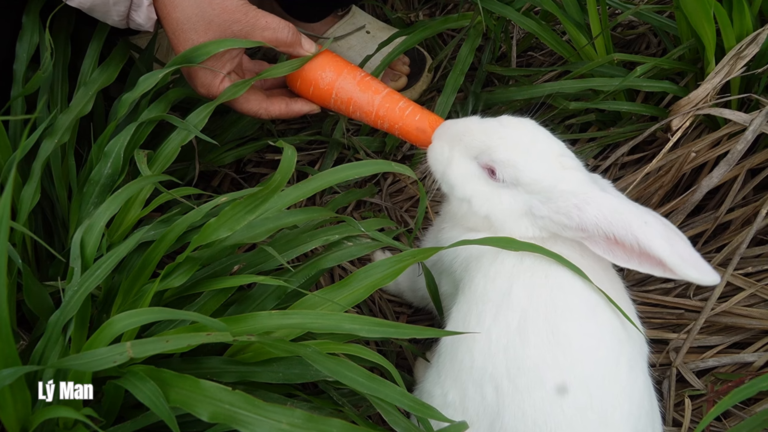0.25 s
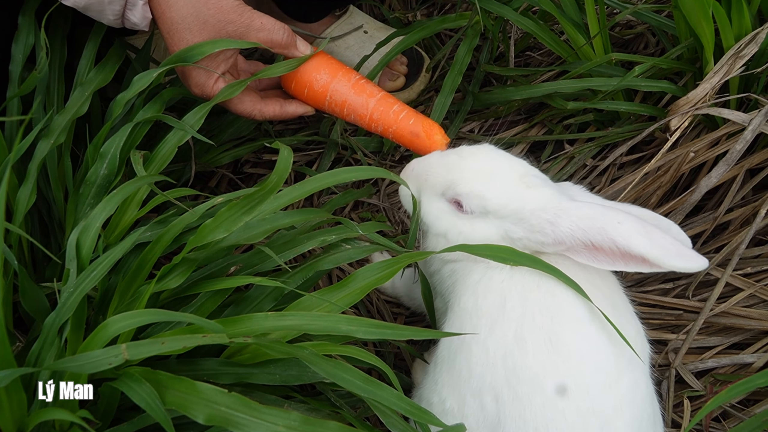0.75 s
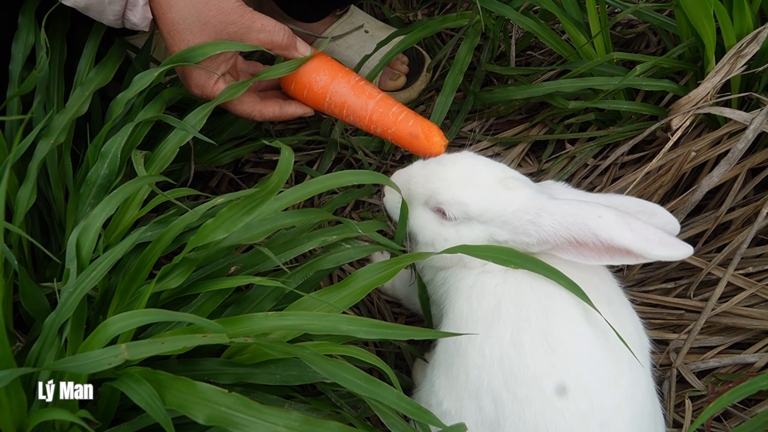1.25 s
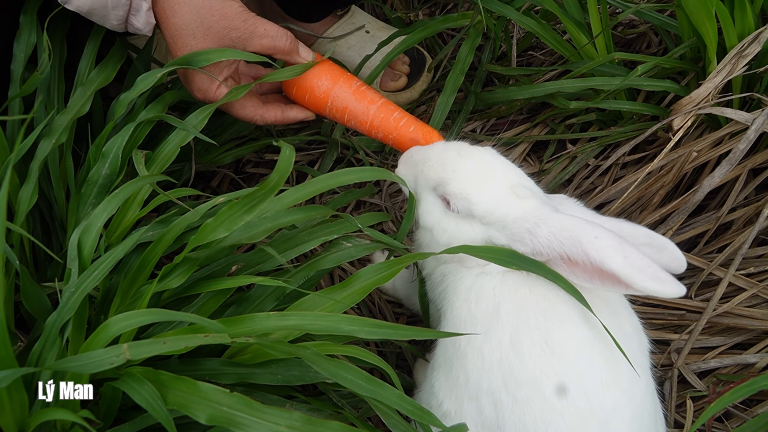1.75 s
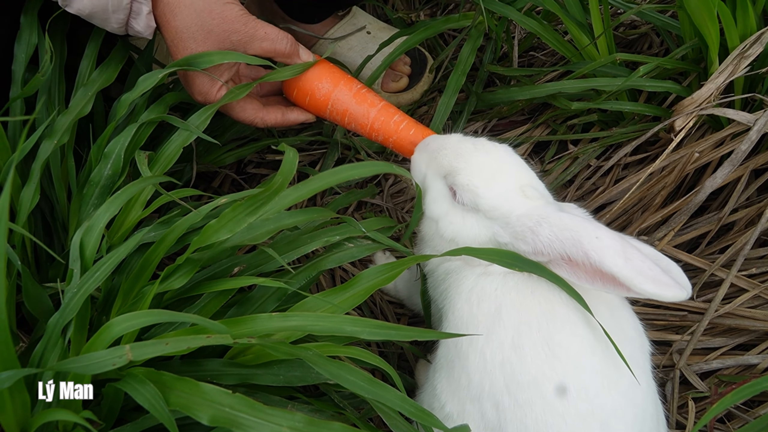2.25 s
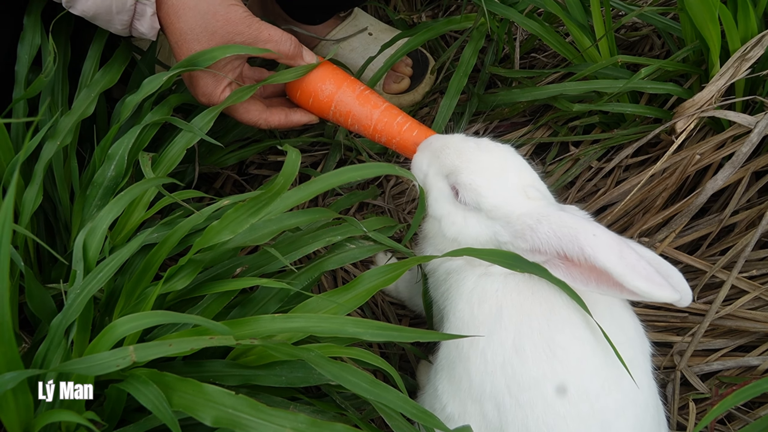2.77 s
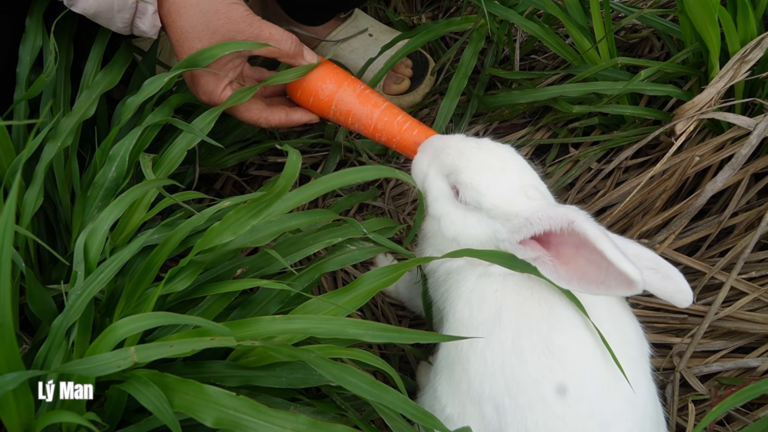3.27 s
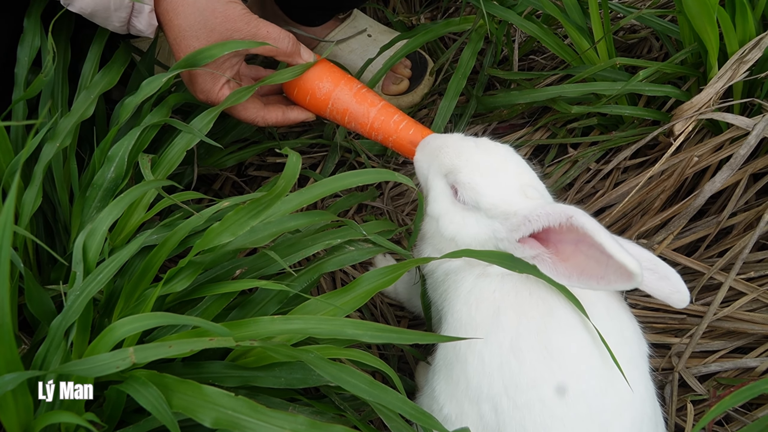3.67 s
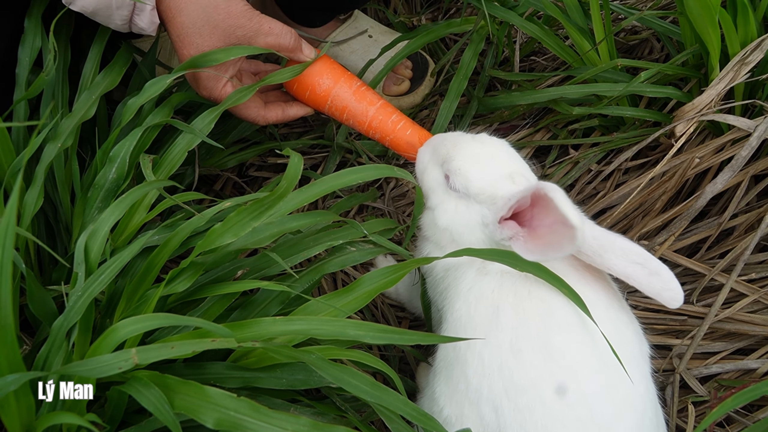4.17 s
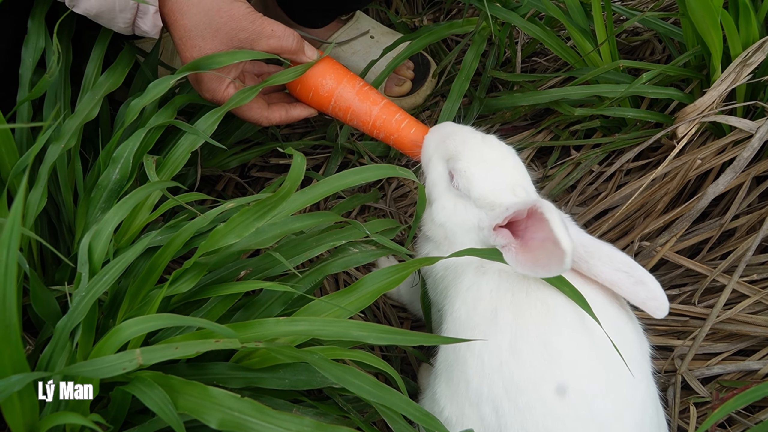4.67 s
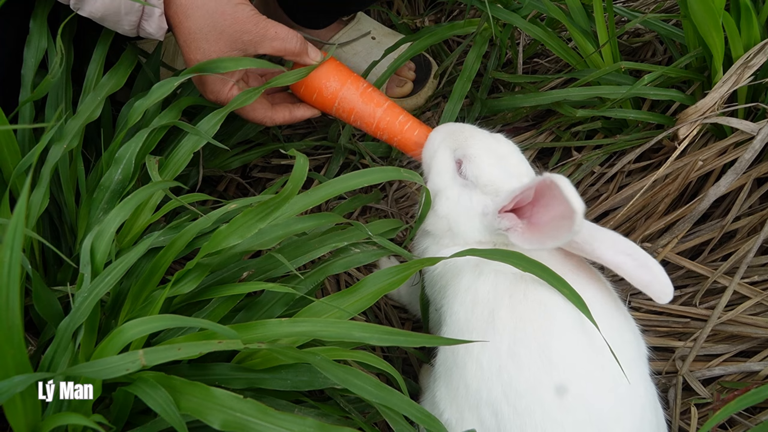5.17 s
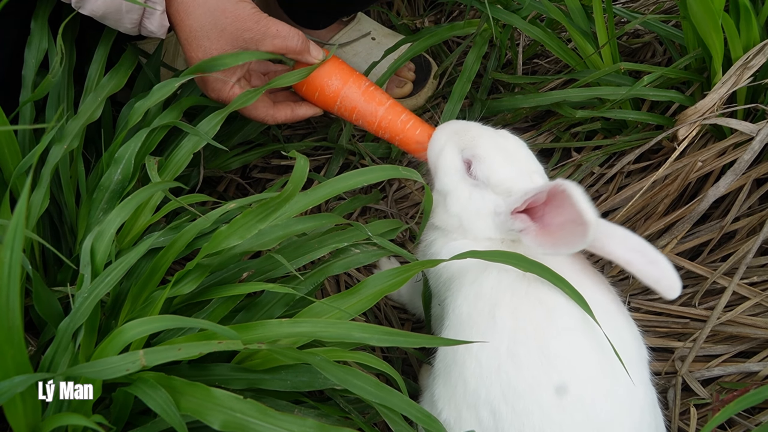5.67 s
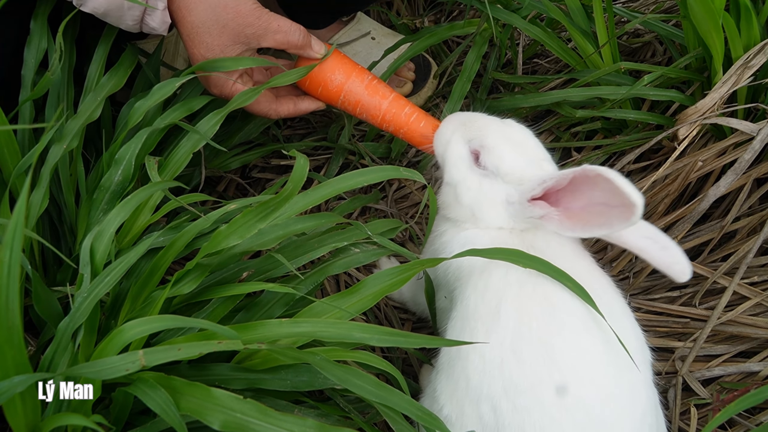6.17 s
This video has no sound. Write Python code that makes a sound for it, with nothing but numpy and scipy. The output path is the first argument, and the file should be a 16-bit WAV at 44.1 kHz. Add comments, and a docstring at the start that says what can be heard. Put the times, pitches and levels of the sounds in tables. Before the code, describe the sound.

A soft, even hiss of woodland air runs throughout. A distant bird repeats short falling peeps while another answers with thin rising chips, both softened by the trees. Near the middle a closer bird calls twice with downward whistles. Towards the end a rabbit near the microphone snaps off a few small, crisp bits of carrot, with dry clicks and crunches.

```python
"""A rabbit nibbles a carrot in tall grass on a wooded hillside.
From the start, countless far sources merge into an even hiss; a distant bird whistles falling peeps
and another answers with rising chips, all scattered by the trees. Near the middle a closer bird calls
twice, and faint slurs follow from deeper in the wood. Towards the end the rabbit's teeth snap off
a few crisp bits, each fracture ringing the carrot and jaw."""
import sys
import numpy as np
from scipy import signal
from scipy.fft import rfft, irfft
from scipy.io import wavfile

SR = 44100
rng = np.random.default_rng(int(sys.argv[2]) if len(sys.argv) > 2 else 0)


def wav_record(signal):
    """Record a signal, one row per channel, as 16-bit PCM in the file named by sys.argv[1]."""
    frames = np.transpose(np.atleast_2d(signal))
    bounded = np.clip(frames, -1, 1)
    # unit amplitude maps onto the largest positive 16-bit level
    quanta = np.round(bounded * 32767).astype(np.int16)
    wavfile.write(sys.argv[1], SR, quanta)


N = 283122
TIME = np.arange(N) / SR
BIN_HZ = np.maximum(np.fft.rfftfreq(N, 1 / SR), 1)


def nibbling(crumble_db=1.5, second_crack_s=0.0012, cells_per_s=18000, pivot_hz=9000):
    """Brittle fracture: two cracks and a crackle of bursting cells excite resonances of carrot and jaw."""
    # Each row: start in seconds, relative level in dB, crumbling time in seconds, tilt in dB per octave.
    bites = [(3.6385, -41, .003, 4), (4.8138, -33.5, 0.004, -1), (5.0438, -41, .005, 3),
             (5.0902, -32.5, .003, -1), (5.3122, -36, .001, 0), (5.331, -38.5, .006, -1),
             (5.3385, -37, 0.006, -1.5), (5.3697, -25, 0.0024, .5), (5.578, -45, 0.018, 1),
             (5.613, -39, .003, -1), (6.105, -48, .025, 2)]
    # Each row: resonant frequency in Hz, bandwidth in Hz, relative gain in dB.
    carrot_modes = [(1270, 310, 10), (2700, 1200, -4), (6000, 2000, -4), (9400, 2000, 2),
                    (14800, 2500, -1.5)]
    out = np.zeros(N)
    t = TIME[:SR // 10]
    for start, level_db, crumble_s, tilt_db in bites:
        force = (rng.random(len(t)) < cells_per_s / SR) * rng.standard_normal(len(t))
        force *= from_db(crumble_db) * np.exp(-t / crumble_s)
        force[[0, int(second_crack_s * SR)]] += [.8, -1]  # the two cracks
        at = int(start * SR)
        for k, (hz, width_hz, mode_db) in enumerate(carrot_modes):
            gain = from_db(level_db + mode_db + tilt_db * np.log2(hz / pivot_hz))
            out[at:at + len(t)] += (-1) ** k * gain * resonance(force, hz, width_hz)
    return out


def near_calls():
    """Frequency and amplitude modulation: two whistles start thin, then bend down as they swell."""
    # One list per call. Each row: time in seconds, pitch in Hz, relative level in dB.
    calls = [
        [(2.495, 4900, -46), (2.512, 4710, -51), (2.533, 4530, -47), (2.545, 4300, -50), (2.556, 4000, -44),
         (2.572, 3660, -41), (2.594, 3450, -46)],
        [(2.856, 4790, -51), (2.892, 4500, -53), (2.91, 4370, -47), (2.93, 4090, -44), (2.949, 3740, -38.5),
         (2.968, 3570, -41)],
    ]
    notes = []
    for rows in calls:
        times, hz, db = np.transpose(rows)
        at = np.flatnonzero((TIME >= times[0]) & (TIME < times[-1]))
        notes.append((at, np.interp(TIME[at], times, hz), np.interp(TIME[at], times, db)))
    return whistle(notes, waver=0.012, tremble_db=2.0, rasp_rad=0.55)


def far_birds():
    """Frequency sweeps: falling peeps, answering chips that rise, and faint falling slurs."""
    # Each row: start in seconds, length in seconds, relative level in dB, end pitch in Hz.
    peep_rows = [(0.108, 0.072, -43, 2780), (0.542, 0.097, -45.5, 2680), (.955, 0.085, -48, 2560),
                 (1.399, 0.061, -49, 2860), (2.195, 0.043, -50, 2800), (2.558, 0.07, -49, 2550),
                 (3.361, 0.059, -44, 2770), (3.769, 0.075, -44.5, 2820), (4.25, 0.078, -43, 2635),
                 (4.682, 0.078, -44.5, 2630), (5.117, 0.08, -46, 2770), (5.52, 0.1, -45.5, 2770),
                 (5.993, 0.062, -50, 2890)]
    chip_rows = [(0.387, .05, -48, 5400), (0.805, 0.047, -46, 5380), (1.245, 0.044, -49, 5470),
                 (1.686, 0.05, -52, 5470), (3.613, 0.039, -46.5, 5450), (4.092, 0.048, -49, 5780),
                 (4.525, 0.04, -47, 4850), (4.961, 0.035, -49, 4280), (5.39, .04, -49, 5330),
                 (5.85, 0.031, -50, 5550), (6.298, 0.062, -50, 5420)]
    slur_rows = [(3.225, .065, -56, 4900), (3.44, 0.06, -58, 4330), (3.785, 0.053, -53, 4400),
                 (4.16, 0.077, -54, 4400)]
    peeps = glides(peep_rows, from_hz=3520, span=(.26, .94), bend=.72, crest=.16, rise_db=10, fall_db=6.2)
    chips = glides(chip_rows, from_hz=3450, span=(0, .62), bend=1.15, crest=.3, rise_db=3, fall_db=3.5)
    slurs = glides(slur_rows, from_hz=5450, span=(0, .86), bend=1.3, crest=.5, rise_db=8, fall_db=-1)
    return (whistle(peeps, waver=0.0099, tremble_db=1.7, rasp_rad=0.33)
            + whistle(chips, waver=0.006, tremble_db=2.0, rasp_rad=0.5)
            + whistle(slurs, waver=0.008, tremble_db=4.5, rasp_rad=0.43))


def glides(rows, from_hz, span, bend, crest, rise_db, fall_db):
    """Power-law sweeps under a two-slope envelope; span and crest are fractions of a note's length."""
    notes = []
    for start, length, level_db, to_hz in rows:
        at = np.flatnonzero((TIME >= start) & (TIME < start + length))
        along = (TIME[at] - start) / length
        hz = from_hz + (to_hz - from_hz) * np.interp(along, span, [0, 1]) ** bend
        db = level_db + np.interp(along, [0, crest, 1], [-rise_db, 0, -fall_db])
        notes.append((at, hz, db))
    return notes


def whistle(notes, waver, tremble_db, rasp_rad):
    """A sine oscillation follows each note's (samples, Hz, dB); random phase modulation roughens it."""
    pitch_drift = 1 + waver * drift(145)
    level_drift = tremble_db * drift(57)
    jitter = rasp_rad * drift(500)
    out = np.zeros(N)
    for at, hz, db in notes:
        phase = 2 * np.pi * np.cumsum(hz * pitch_drift[at]) / SR
        envelope = from_db(db + level_drift[at]) * signal.windows.tukey(len(at), .12)
        out[at] += np.sqrt(2) * envelope * np.sin(phase + jitter[at])
    # the whistles carry nothing below about 1.8 kHz
    return signal.sosfilt(signal.butter(4, 1800, "high", fs=SR, output="sos"), out)


def among_trees(x, early_db, tail_db, tail_t60_s, spread, tail_cut_hz):
    """Scattering: trunks smear each note and the wood adds a leaf-dulled tail, differing at each ear."""
    first_echo_s, trunks_t60_s = 0.008, 0.055
    t = TIME[:SR // 2]
    early = from_db(early_db) * rms_one(from_db(-60 * t / trunks_t60_s) * (t > first_echo_s))
    tail = from_db(tail_db) * rms_one(from_db(-60 * t / tail_t60_s) * (t > first_echo_s))
    scatter = rng.standard_normal((2, 2, len(t)))
    leaves = signal.butter(4, tail_cut_hz, fs=SR, output="sos")
    shared, apart = early * scatter[0] + tail * signal.sosfilt(leaves, scatter[1])
    echoes = np.array([shared + spread * apart, shared - spread * apart])
    echoes /= np.sqrt(len(t) * (1 + spread ** 2))
    return x + signal.fftconvolve(x[None], echoes, axes=1)[:, :N]


def woodland(level_db=-41.5, side_db=-16.8, waver=0.066):
    """Incoherent summation: countless far sources merge into a hiss, slightly wider in the treble."""
    # Spectra of what the ears share and what differs. Each row: frequency in Hz, relative density in dB.
    mid_spectrum = [(30, -54), (95, -41), (190, -29.5), (300, -19), (430, -9.5), (750, -1.5), (1250, 1),
                    (1800, 0.3), (2500, -0.86), (3300, -2), (4400, -5.5), (6500, -11), (10000, -17.5),
                    (15300, -25)]
    side_spectrum = [(30, -52), (100, -45), (200, -34), (400, -13.5), (700, -5.5), (1100, -5), (1400, -6),
                     (2300, -2.5), (3300, 2), (5000, 0), (8000, -10), (11000, -12.5), (15500, -15)]
    mid = coloured_noise(mid_spectrum)
    mid += waver * drift(9.3) * resonance(mid, hz=1400, width_hz=970)  # the midrange wavers a little
    side = from_db(side_db) * coloured_noise(side_spectrum)
    return from_db(level_db) * np.array([mid + side, mid - side])


def hiss_swells(centre_hz=1590, width_hz=1750):
    """Amplitude modulation of a noise band: the midrange of the hiss briefly rises and sinks."""
    # Each row: time of the peak in seconds, half length in seconds, level in dB.
    swells = [(2.22, .018, -48), (2.304, .04, -50), (2.607, 0.036, -45.5), (5.332, 0.03, -47)]
    envelope = sum(from_db(db) * np.exp(-((TIME - peak_s) / half_s) ** 2) for peak_s, half_s, db in swells)
    band = resonance(rng.standard_normal(N), centre_hz, width_hz)
    return envelope * rms_one(resonance(band, centre_hz, width_hz))


def resonance(x, hz, width_hz):
    """A damped oscillator: two poles, unit gain at the peak."""
    r = np.exp(-np.pi * width_hz / SR)
    feedback = [1, -2 * r * np.cos(2 * np.pi * hz / SR), r * r]
    return signal.lfilter(np.array([1, 0, -1]) * (1 - r * r) / 2, feedback, x)


def coloured_noise(spectrum):
    """Spectral shaping of white noise by (Hz, dB) points; rms 1."""
    hz, db = np.transpose(spectrum)
    gain = from_db(np.interp(np.log(BIN_HZ), np.log(hz), db))
    return rms_one(irfft(rfft(rng.standard_normal(N)) * gain, N))


def drift(corner_hz):
    """Random fluctuation: low-passed noise of rms 1."""
    return rms_one(irfft(rfft(rng.standard_normal(N)) / (1 + (BIN_HZ / corner_hz) ** 2), N))


def from_db(db):
    """Decibels to amplitude ratio."""
    return 10 ** (np.asarray(db) / 20)


def rms_one(x):
    """Normalisation to rms 1."""
    return x / np.sqrt(np.mean(x ** 2) + 1e-20)


def scene():
    """Superposition: hiss all round, birds among the trees, the rabbit straight ahead."""
    hiss = woodland() + hiss_swells()
    birds = from_db(-1) * far_birds()
    calls = near_calls()
    far = among_trees(birds, early_db=-3.5, tail_db=-1, tail_t60_s=0.89, spread=0.41, tail_cut_hz=3500)
    near = among_trees(calls, early_db=-3.0, tail_db=-10, tail_t60_s=0.3, spread=1.0, tail_cut_hz=5500)
    balance = from_db([[0.04], [-0.04]])  # left, right
    return (nibbling() + near + far + hiss) * balance


def record(dry):
    """Band limiting: a steep elliptic low-pass removes the highest treble."""
    cutoff_hz = 15900
    return signal.sosfilt(signal.ellip(12, .1, 70, cutoff_hz, fs=SR, output="sos"), dry)


dry = scene()
out = record(dry)
wav_record(out)
```